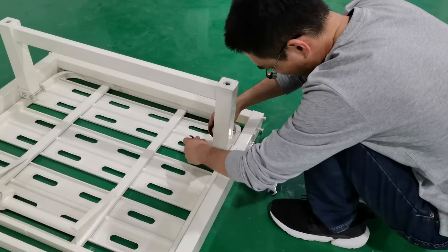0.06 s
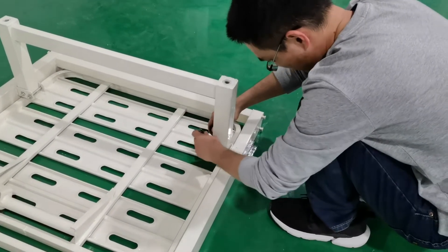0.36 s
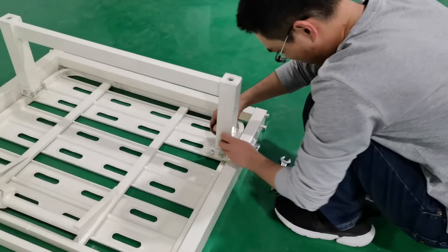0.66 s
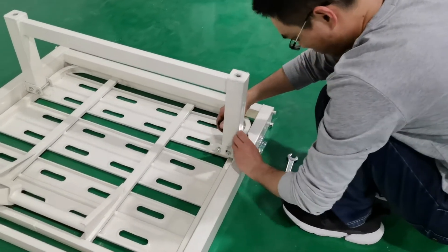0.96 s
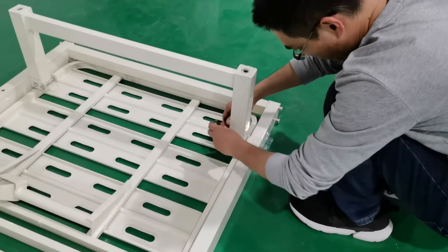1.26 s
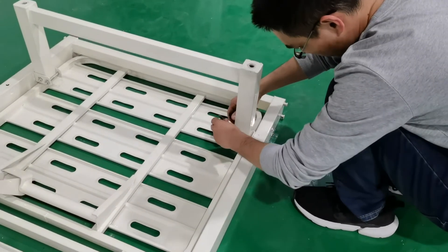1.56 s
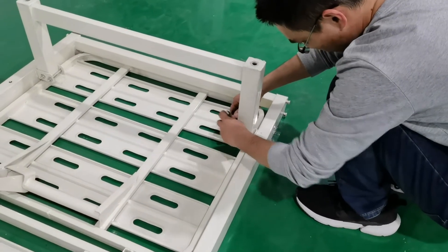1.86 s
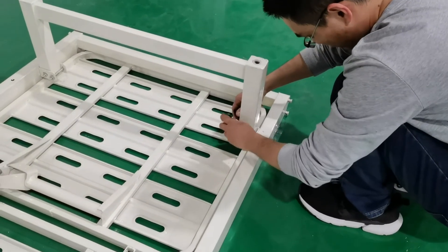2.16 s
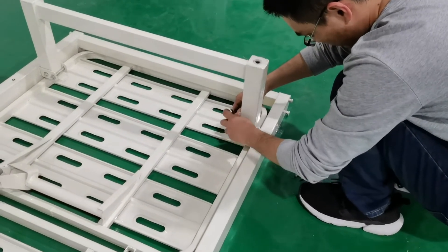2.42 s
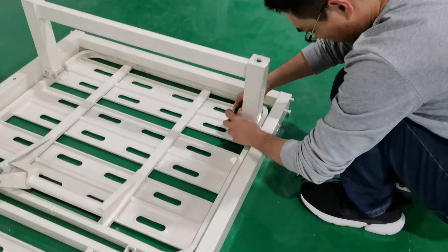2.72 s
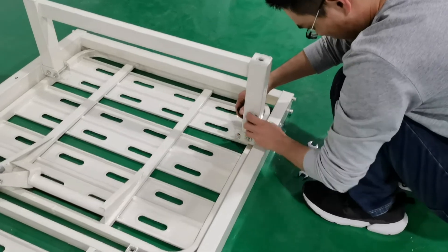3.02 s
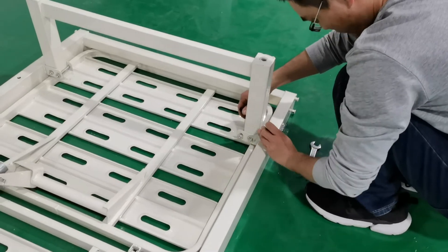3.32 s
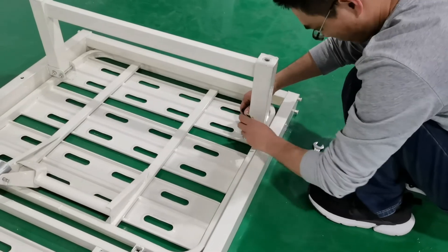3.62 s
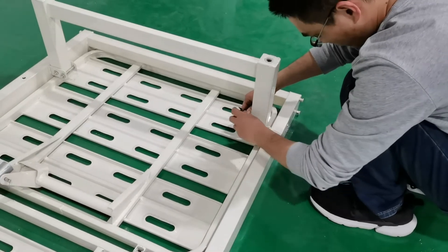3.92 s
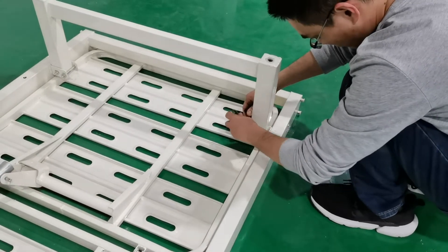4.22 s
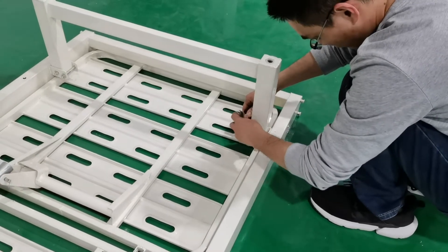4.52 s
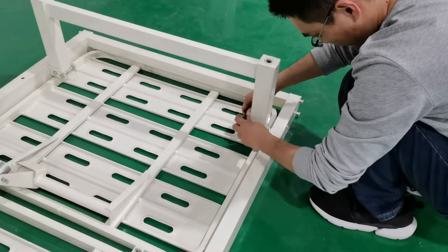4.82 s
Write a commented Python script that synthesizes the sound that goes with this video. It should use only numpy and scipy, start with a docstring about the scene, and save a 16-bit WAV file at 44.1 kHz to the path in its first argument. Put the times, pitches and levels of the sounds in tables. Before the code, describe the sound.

Steel bed frame parts clink and clang as they are bolted together by hand, ringing into an echoing factory hall.

```python
"""Steel knocks on steel and rings into a factory hall: a bed frame is being bolted together by hand.
A spanner and a loose bracket strike the tubes; each blow is a clatter of crowded resonances
with single modes ringing on into the long echo. In between, joints squeak, a bolt scrapes and
soft bumps land close to the microphone. Underneath lie a low swelling drone and the air of the hall."""
import sys
import numpy as np
from scipy import signal
from scipy.fft import rfft, irfft
from scipy.io import wavfile

SR = 44100
rng = np.random.default_rng(int(sys.argv[2]) if len(sys.argv) > 2 else 0)


def to_wav(sig):
    """Store sig (one row per channel, or 1-D mono) as 16-bit WAV at the path in sys.argv[1].

    Samples outside -1..1 are clipped; the rate is SR.
    """
    pcm = np.clip(np.atleast_2d(sig), -1, 1) * 32767
    pcm = np.round(pcm).astype(np.int16)
    wavfile.write(sys.argv[1], SR, pcm.T)  # frames by channels


N = 224061

# Ringing modes of frame, bracket and edges. Each row: frequency in Hz, level in dB, t60 in seconds.
FRAME_MODES = [(481, -4, 1.1), (706, 0, .7), (863, -8, 1.1), (1110, -5, .8), (1222, -2, .9),
               (1260, -5, .85), (1456, -2, 1.1), (1564, -2, .9), (1591, 0, 1.1)]
BRACKET_MODES = [(2236, -5, .4), (2402, -5, .25), (2446, 0, .4), (2511, -5, .45), (2580, -7, .3),
                 (2644, -1, .7), (2715, -2, .6), (2778, 1, .75), (2861, -1, .6), (2945, -7, .5),
                 (3077, -6, .45), (3120, -9, .4)]
EDGE_MODES = [(3445, -11, .5), (3833, -14, .5), (4043, -12, .6), (4334, -1, .55), (4592, -3, .55),
              (4724, 0, .8), (5540, -10, .45), (5790, -10, .5)]
# The rasp of the steel edges. Each row: frequency in Hz, level in dB.
EDGE_SPECTRUM = [(2600, -38), (3400, 3.5), (4000, -0.5), (4500, 1), (5200, -7), (5750, -3.5), (6250, -15),
                 (7600, -16), (9000, -50)]
# How alike left and right sound. Each row: frequency in Hz, likeness from 0 to 1.
LIKENESS = [(100, 0.75), (350, 0.94), (700, 0.68), (1500, 0.087), (4000, 0.042)]
RIPPLE_HZ = np.arange(0, 23000, 45)
RIPPLE = rng.standard_normal(len(RIPPLE_HZ))  # crowded resonances keep their places from blow to blow
RING_TIME = np.arange(int(1.5 * SR)) / SR


def amp(db):
    """Decibels to gain."""
    return 10 ** (np.asarray(db) / 20)


def read(points, hz):
    """A table read along a logarithmic frequency axis."""
    f, value = np.transpose(points)
    return np.interp(np.log(hz + 1), np.log(f + 1), value)


def add(mix, s, sound):
    """Adds a sound to the mix at s seconds, which may lie before the start."""
    at = round(s * SR)
    sound = sound[..., max(-at, 0):]
    part = mix[:, max(at, 0):][:, :sound.shape[-1]]
    part += sound[..., :part.shape[1]]


def left_right(pan_db, hz):
    """Left and right gains: the left side is shaded, most of all in the low treble."""
    # Each row: frequency in Hz, factor on the pan in dB.
    shade = [(200, 0.0), (700, 0.44), (1300, 0.45), (2400, 1.61), (4400, 0.87), (15000, 0.98)]
    left_db = pan_db * read(shade, hz)
    return amp([left_db, np.zeros_like(left_db)])


def noise(colour, pan_db, size):
    """Stereo noise coloured by a function from Hz to dB, alike in the bass, with rms 1 on the right."""
    hz = np.fft.rfftfreq(size, 1 / SR)
    right, other = rfft(rng.standard_normal((2, size)))
    likeness = read(LIKENESS, hz)
    left = likeness * right + np.sqrt(1 - likeness ** 2) * other
    x = irfft(np.array([left, right]) * amp(colour(hz)) * left_right(pan_db, hz), size)
    return x / x[1].std()


def spot_lift(hz, spot_hz, lift_db=7, width=0.13):
    """The point of contact lifts the resonances around one frequency, in dB."""
    return lift_db * np.exp(-(np.log((hz + 1) / spot_hz) / width) ** 2)


def hall(x, gap_s=0.002, build_s=0.0029):
    """A diffuse echo that builds up, each band dying at its own speed."""
    # Each row: frequency in Hz, t60 in seconds.
    decay_times = [(100, 0.58), (400, 1.29), (1400, 1), (2700, 1.074), (4500, 0.82), (7500, 0.83),
                   (11000, 0.63), (16000, 1.09)]
    hz, t, bands = signal.stft(noise(np.zeros_like, 0, 2 * SR), SR, nperseg=256)
    tail = signal.istft(bands * amp(-60 * t / read(decay_times, hz)[:, None]), SR, nperseg=256)[1]
    tail *= 1 - np.exp(-np.maximum(np.arange(tail.shape[1]) / SR - gap_s, 0) / build_s)
    return signal.fftconvolve(x, tail / np.linalg.norm(tail[1]), axes=1)[:, :N]


def air(level_db=-58, pan_db=-4):
    """The steady rumble and hiss of the hall."""
    # Each row: frequency in Hz, relative level in dB.
    spectrum = [(20, -9), (65, 1.5), (120, -11), (200, -18.5), (400, -25.5), (900, -29), (1400, -28),
                (2000, -29.5), (2700, -24), (3700, -38), (5000, -38.5), (8400, -57), (10500, -48),
                (15500, -50)]
    return amp(level_db) * noise(lambda hz: read(spectrum, hz), pan_db, N)


def drone(hz=51.2, wander_hz=1.84, rise_s=0.053, fall_s=0.072, left_lead_rad=0.38):
    """A low tone that comes in smooth swells, its pitch unsteady."""
    # Each row: start in seconds, length in seconds, level in dB.
    swells = [(-.03, 0.15, -45.5), (0.115, .13, -46), (1.16, 0.27, -48.5), (1.36, 0.35, -43),
              (1.884, 0.35, -42.5), (2.298, .28, -41.5), (2.65, .17, -39), (2.871, 0.16, -44),
              (3.076, .18, -44), (3.46, 0.13, -46.5), (3.618, 0.37, -49.5), (4.1, 0.29, -50),
              (4.4, 0.25, -49), (4.707, 0.12, -43)]
    t = np.arange(N) / SR
    drift = np.interp(t, np.linspace(0, t[-1], 60), rng.standard_normal(60))
    level = np.zeros(N)
    for start, length, db in swells:
        opening = np.clip(np.minimum((t - start) / rise_s, (start + length - t) / fall_s), 0, 1)
        level += amp(db) * np.sin(np.pi / 2 * opening) ** 2
    phase = 2 * np.pi * np.cumsum(hz + wander_hz * drift) / SR
    return level * np.sin([phase + left_lead_rad, phase])


def bumps(width_cycles=0.41):
    """Dull, dry pushes of about one cycle, close to the microphone."""
    # Each row: centre in seconds, peak in dB, frequency in Hz.
    pushes = [(2.150, -40, 253.4), (2.195, -45.5, 148.2), (2.375, -48.5, 245.5), (2.498, -39.5, 706),
              (2.502, -35, 149), (2.632, -34.5, 121), (2.742, -36.5, 181), (3.074, -44.5, 1000),
              (3.075, -49, 352), (3.671, -35, 348), (5.054, -41, 317), (5.062, -50, 64.8)]
    out = np.zeros((2, N))
    t = RING_TIME[:SR // 10] - 0.05
    for centre, db, hz in pushes:
        push = -np.exp(-(hz * t / width_cycles) ** 2) * np.sin(2 * np.pi * hz * t)
        add(out, centre + t[0], amp(db) * push / abs(push).max())
    return out


def scrape(start_s=3.02, level_db=-54.5, rise_s=0.017, hold_s=0.015, t60=0.15, pan_db=-22):
    """A bolt slides along the edge of its hole: one short, bright rasp."""
    t = np.arange(N) / SR - start_s
    fade_db = -60 * np.maximum(t - rise_s - hold_s, 0) / t60
    stroke = np.clip(t / rise_s, 0, 1) * amp(level_db + fade_db)
    return stroke * noise(lambda hz: read(EDGE_SPECTRUM, hz) + spot_lift(hz, 5400, width=0.46), pan_db, N)


def squeaks(pan_db=-9, bend=0.012):
    """The joints squeak, each time on one tone that sags a little."""
    # Each row: start in seconds, length in seconds, pitch in Hz, peak in dB.
    chirps = [(0.8, 0.023, 730, -58), (1.085, 0.069, 2210, -64.5), (2.857, 0.05, 1546, -70),
              (2.918, 0.064, 1588, -76), (3.178, 0.061, 1217, -54), (3.652, 0.025, 526, -40)]
    out = np.zeros((2, N))
    for start, length, hz, db in chirps:
        t = RING_TIME[:round(length * SR)]
        pitch = hz * (1 + bend * np.cos(np.pi * t / length))
        tone = np.sin(2 * np.pi * np.cumsum(pitch) / SR) * np.sin(np.pi * t / length) ** 2
        add(out, start, amp(db) * left_right(pan_db, hz)[:, None] * tone)
    return out


def attack(t, crack, hard_s=0.0022, soft_s=0.032, firmness=10):
    """A square blow sounds at once; a glancing one, with little crack, swells in."""
    return 1 - np.exp(-t / (hard_s + soft_s * np.exp(-firmness * crack)))


def clatter(spectrum, spot_hz, pan_db, crack, t60, ripple_db=2, crack_s=0.0013, peak_db=6, width_hz=13):
    """Crowded resonances struck at once, main modes standing out: a short crack, then a steady decay."""
    t = RING_TIME[:SR // 2]
    body = amp(-60 * t / t60) * attack(t, crack)
    spike = crack ** 2 / (crack + 0.27) * t / crack_s * np.exp(1 - t / crack_s)
    mode_hz, mode_db, _ = np.transpose(FRAME_MODES + BRACKET_MODES + EDGE_MODES)

    def colour(hz):
        peaks = np.exp(-((hz[:, None] - mode_hz) / width_hz) ** 2) @ amp(mode_db)
        ripple = np.interp(hz, RIPPLE_HZ, RIPPLE)
        return read(spectrum, hz) + spot_lift(hz, spot_hz) + peak_db * peaks + ripple_db * ripple
    return noise(colour, pan_db, len(t)) * (body + spike)


def ring(modes, spot_hz, pan_db, crack, spread_db=3.5):
    """Single modes ring out as decaying sines; each blow weighs them a little differently."""
    hz, db, t60 = np.transpose(modes)
    weight, phase, skew = rng.standard_normal((3, len(hz)))
    strength = amp(db + spot_lift(hz, spot_hz) + spread_db * weight)
    strength /= np.linalg.norm(strength)
    left_lead = skew * (1 - read(LIKENESS, hz)) / 2
    stereo = left_right(pan_db, hz) * np.exp(1j * np.pi * np.array([phase + left_lead, phase]))
    t = RING_TIME[:round(t60.max() * SR)]
    waves = np.exp(np.outer(2j * np.pi * hz - np.log(1000) / t60, t))
    onset = attack(t, crack) * (1 - np.exp(-t * hz.min()))  # the lowest mode needs a cycle to build
    return ((stereo * strength) @ waves).real * onset


def blows():
    """Each blow sounds tubes, bracket, edges and base; hard-seated ones ring on and fill the hall."""
    # Steel on steel. Each row: start in seconds, force in dB; trims in dB for tube clang, bracket clink,
    # edge rasp, contact tick and low thud; pan in dB, lasting ring in dB, crack as a factor (near 0 is
    # a glancing rub); the frequencies in Hz lifted in the tubes, bracket, edges and tick.
    hits = [(-.05, -26.5, -13, 5, -13.5, -53, -6.5, -12.5, 2.5, .3, 544, 2700, 6400, 10200),
            (.141, -29, -2, 7, -2, -25.5, -10.5, -12, -2.5, 0.71, 1120, 2810, 4430, 10900),
            (1.196, -19, -26.5, -2.5, -34, -33, -38, -12.5, -4.5, 0.32, 1110, 2650, 4700, 14000),
            (1.2059, -21.5, -20, -13, -17.5, -22.5, -22, -13.5, -3, 1.34, 1640, 2620, 4850, 14300),
            (1.452, -13, -17.5, -3, -18.5, -34, -25, -12.5, -2, .4, 1150, 2710, 4590, 10600),
            (1.648, -24, -21.5, -4, -25, -40, -30, -14, 7.5, 0.14, 1480, 2700, 4400, 10200),
            (1.7036, -17, -18, -3.5, -17, -33.5, -31, -12, 1.15, 2.12, 614, 2620, 4670, 13000),
            (1.923, -41.5, -14, -3.5, -16, -40, -23, -14, 8.5, 4.6, 1470, 2770, 4730, 10100),
            (2.118, -30.5, -23, -6, -24, -37, -10.5, -10, -0.5, 0.28, 480, 2950, 4540, 10100),
            (2.244, -54.5, -13, -4, -17, -44.5, -4, -20, -2.5, 10.4, 485, 2770, 5400, 10180),
            (2.630, -34, -8.5, 0, -10.5, -27.5, -4, -11, -11, 0.87, 1580, 2850, 3140, 11000),
            (2.701, -45, -7, -7.5, -8.5, -16.5, 1, -29, -24.5, .1, 1650, 2800, 6900, 10200),
            (2.783, -61.5, -22.5, -5, -6, -7.5, -9, -16.5, -19, 2, 1575, 2820, 6700, 12000),
            (3.271, -64.5, -16, -20.5, -14, -16, -24, -13.5, -6.5, .9, 1400, 2810, 6760, 10200),
            (3.673, -20, -18, -4, -19, -23, -20, -10, -3, 0.4, 1334, 2140, 4890, 10630),
            (3.855, -15.5, -17, -7, -15.5, -33, -38, -7.5, -7.5, 1.04, 1340, 2870, 3450, 13500),
            (3.866, -18.5, -15.5, -2.5, -19, -32, -40, -14.5, -2, 0.94, 1760, 2790, 3400, 13000),
            (4.004, -35.5, -11, 4, -9.5, -19.5, -41, -9.5, 2, 0.24, 1340, 3020, 3600, 13000),
            (4.104, -28.5, -19, -1, -11, -22, -31, -8, 2, 1.53, 1380, 2080, 4140, 14200),
            (4.159, -21, -12.5, -3, -17, -34, -37.5, -10, -3.5, 0.96, 1300, 2200, 4200, 13000),
            (4.238, -31, -11, .5, -12, -22, -38, -13, -1.5, .6, 1530, 2690, 3700, 10500),
            (4.436, -18, -19, -5.5, -27, -50, -19.5, -10.5, -3.5, 0.32, 390, 3030, 3040, 11000),
            (4.633, -29, -19, 4, -15.5, -43, -16, -7, -2, 0.18, 700, 2600, 6050, 10200),
            (4.646, -14, -25, -11, -29.5, -44, -14.5, -10.5, -1, 1.5, 626, 3160, 3370, 13800)]
    # Tone colours of the clang, the clink and the tick. Each row: frequency in Hz, level in dB.
    tube_spectrum = [(150, -16.5), (330, -6.5), (430, -4), (520, 2), (600, -5.5), (700, 0.5), (920, -7),
                     (1080, 0), (1250, 1.5), (1400, -0.5), (1600, 3.5), (1950, 0.5), (2600, -30),
                     (3600, -54)]
    bracket_spectrum = [(1500, -29), (2050, -4), (2250, 3.5), (2480, 3), (2800, 0), (3100, -2),
                        (3400, -12.5), (4200, -47.5)]
    tick_spectrum = [(5000, -31), (7000, 2.5), (8200, -4), (9000, -3.5), (10100, 6), (11200, 2.5),
                     (12000, -1), (13200, 1.5), (14500, -8.5), (15800, -10.5)]
    # The thud of the slatted base. Each row: frequency in Hz, level in dB, t60 in seconds.
    base_modes = [(110, -8, .4), (123, 0, .5), (165, -3, .25), (205, -7, .2), (275, -2, .2), (312, -3, .2),
                  (356, 0, .25), (405, -2, .22), (480, -3, .3)]
    near, sent = np.zeros((2, 2, N))
    for (start, force_db, clang_db, clink_db, rasp_db, tick_db, thud_db,
         pan_db, ring_db, crack, tube_hz, bracket_hz, edge_hz, tick_hz) in hits:
        # Each row: sound, trim in dB, hall send in dB.
        layers = [
            (clatter(tube_spectrum, tube_hz, pan_db, crack, t60=0.56), clang_db + 1.5, -1.5),
            (ring(FRAME_MODES, tube_hz, pan_db, crack), clang_db + ring_db - 5.5, -8),
            (clatter(bracket_spectrum, bracket_hz, pan_db, crack, t60=0.29), clink_db - 1, -4.5),
            (ring(BRACKET_MODES, bracket_hz, pan_db, crack), clink_db + ring_db - 15.5, -9),
            (clatter(EDGE_SPECTRUM, edge_hz, pan_db, crack, t60=0.28, ripple_db=4), rasp_db + 2, -3),
            (ring(EDGE_MODES, edge_hz, pan_db, crack), rasp_db + ring_db - 22.5, -9),
            (clatter(tick_spectrum, tick_hz, pan_db, 0.71 * crack, t60=0.19, ripple_db=4),
             tick_db + 3.5, -7),
            (ring(base_modes, 306, pan_db, crack), thud_db + 4, -12)]
        for sound, trim_db, send_db in layers:
            add(near, start, amp(force_db + trim_db) * sound)
            add(sent, start, amp(force_db + trim_db + send_db + ring_db) * sound)
    return near + amp([[1.5], [0.3]]) * hall(sent)  # the echo returns a little louder on the left


def scene(rubbing_send_db=-11):
    """The work on the frame over the background of the hall."""
    knocks = blows() + bumps()
    rubbing = scrape() + squeaks()
    return knocks + rubbing + amp(rubbing_send_db) * hall(rubbing) + drone() + air()


def record(dry, cutoff_hz=16150):
    """The recorder's band limit cuts off the very top of the treble."""
    lowpass = signal.firwin(401, cutoff_hz, window=("kaiser", 8), fs=SR)
    return signal.oaconvolve(dry, lowpass[None], "same")


dry = scene()
out = record(dry)
to_wav(out)
```